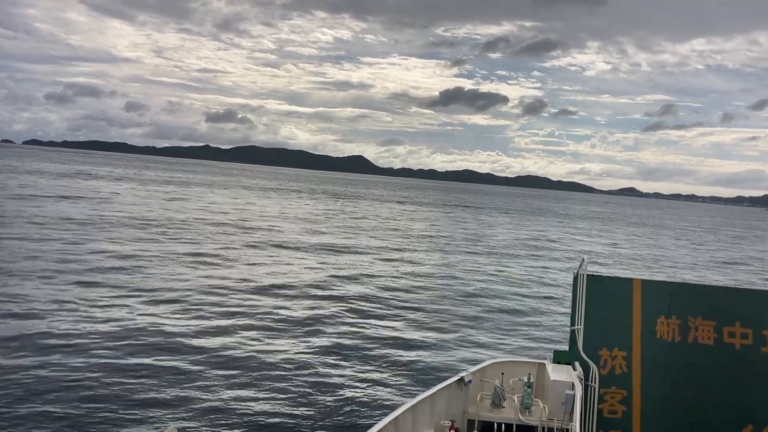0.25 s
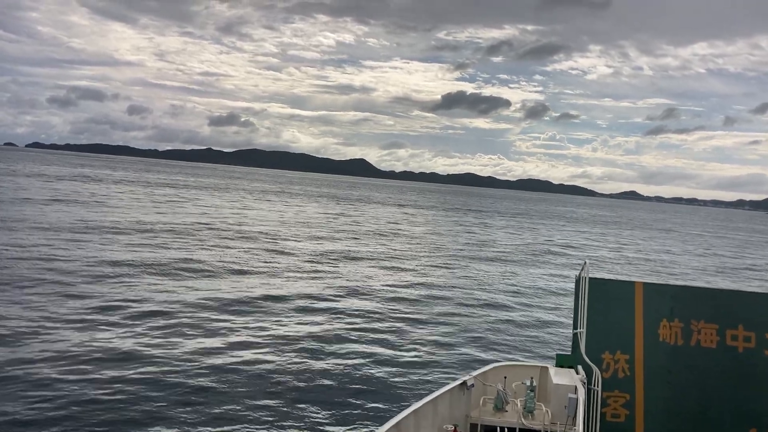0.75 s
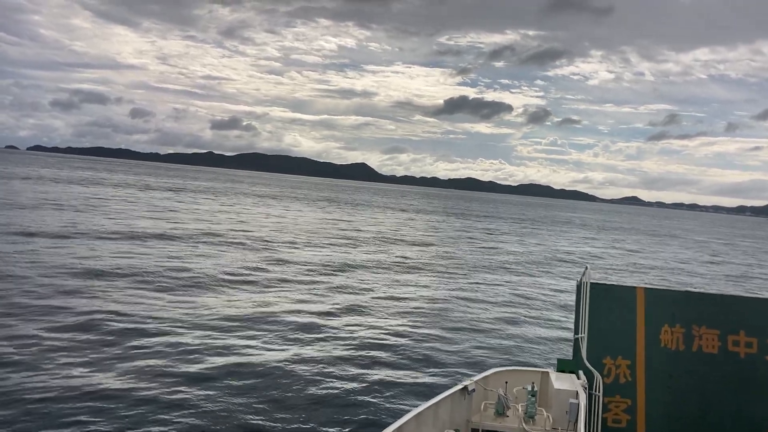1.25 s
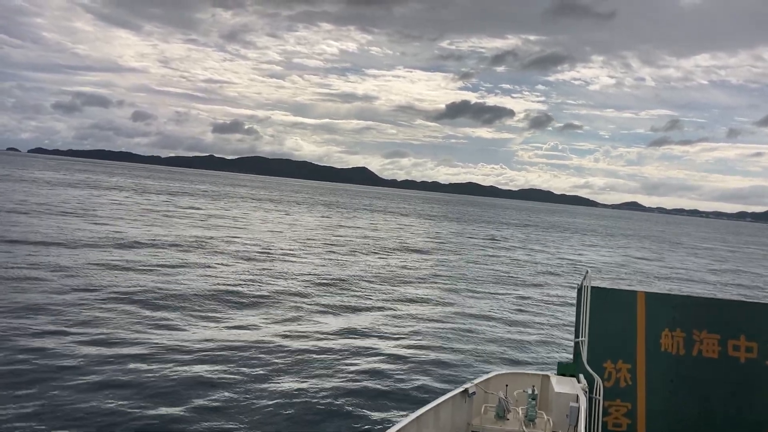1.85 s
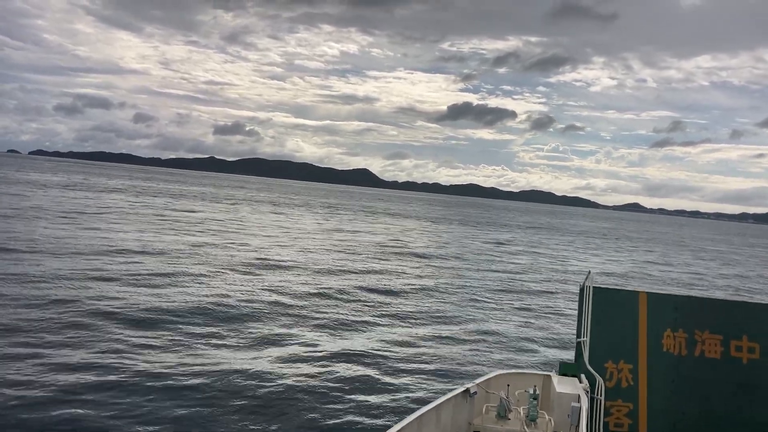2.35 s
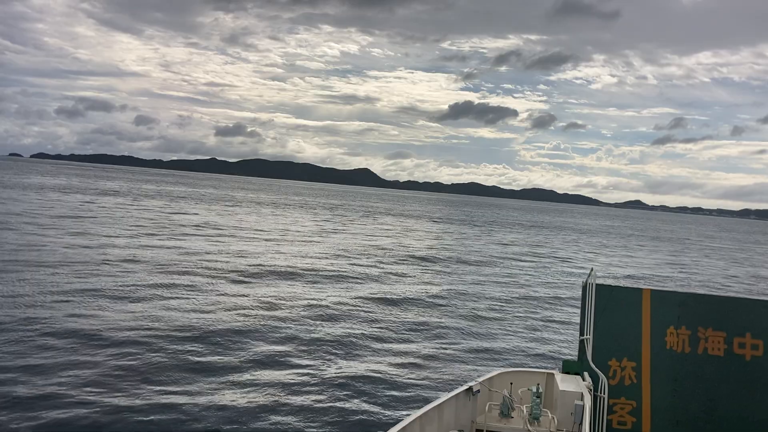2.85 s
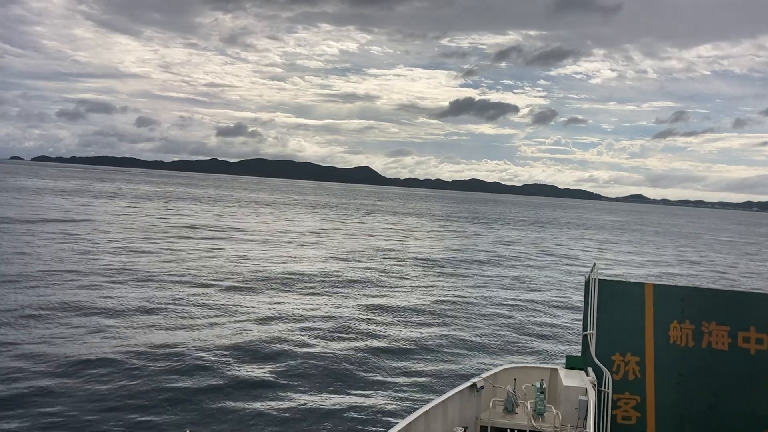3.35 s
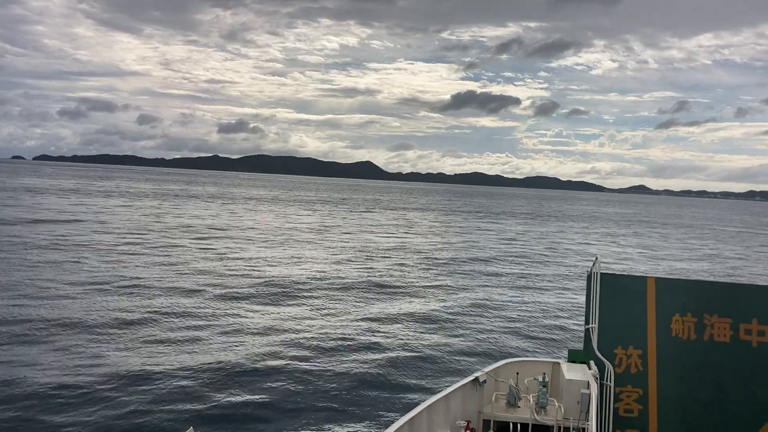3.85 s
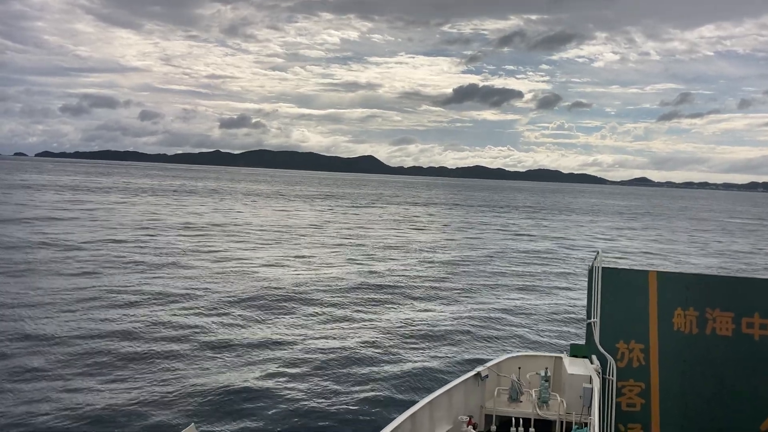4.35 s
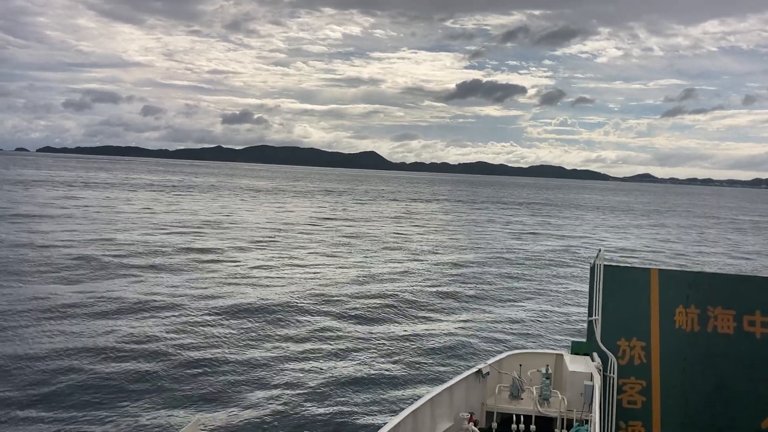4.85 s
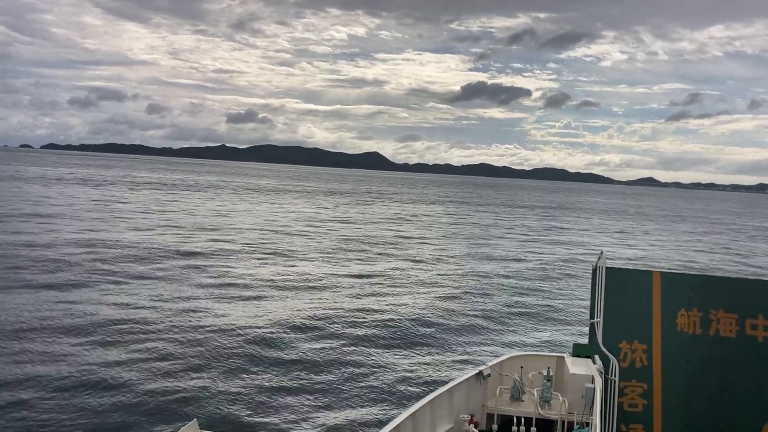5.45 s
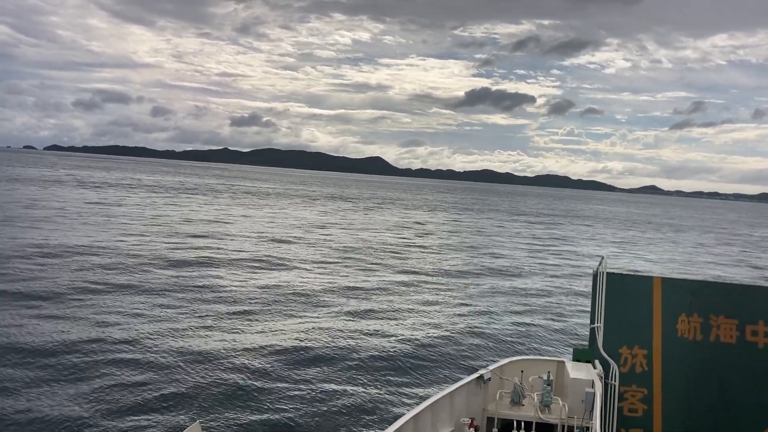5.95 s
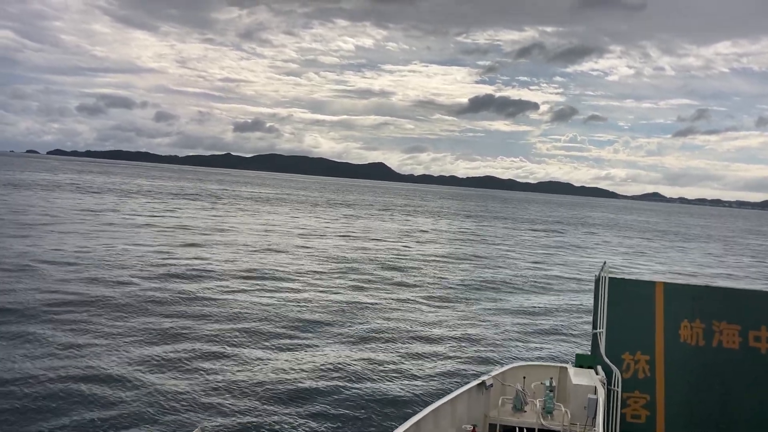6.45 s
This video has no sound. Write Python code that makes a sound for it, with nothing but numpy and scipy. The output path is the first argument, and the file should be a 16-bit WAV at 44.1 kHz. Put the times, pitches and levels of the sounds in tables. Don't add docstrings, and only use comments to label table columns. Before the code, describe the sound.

On the open upper deck of a ferry under way, a slow, heavy diesel drones without change, its deep hum strongest near fifty hertz. Smaller machines hum beside it and water rumbles against the steel hull. Soft wash slides along the side. A spray hiss fades at the very start, returns as a gentle swell around two seconds, then stays faint. Handheld phone, stereo, dull and bass-heavy.

```python
import sys
import numpy as np
from scipy import signal
from scipy.fft import rfft, irfft
from scipy.io import wavfile
from scipy.ndimage import uniform_filter1d

SR = 44100
rng = np.random.default_rng(int(sys.argv[2]) if len(sys.argv) > 2 else 0)


def wrap_up_sound(samples):
    columns = np.atleast_2d(samples).T
    tamed = np.clip(columns, -1, 1)
    steps = np.round(tamed * 32767).astype(np.int16)
    wavfile.write(sys.argv[1], SR, steps)


def rack_gain(trim_db):
    fader = np.asarray(trim_db, float)
    return 10 ** (fader / 20)


N = 295470
T = np.arange(N) / SR
F = np.fft.rfftfreq(N, 1 / SR) + 1e-3


def swing(rows, column):
    rows = np.array(rows)
    return np.interp(T, rows[:, 0], rows[:, column] - np.median(rows[:, column]))


def walk(rate_hz):
    hold = int(SR / rate_hz)
    steps = np.repeat(rng.standard_normal(N // hold + 1), hold)
    smooth = uniform_filter1d(uniform_filter1d(steps, hold), hold)
    return 1.3 * smooth[:N]


def density(table, hz):
    rows = np.array(table)
    return np.interp(np.log(hz), np.log(rows[:, 0]), rows[:, 1], left=-160, right=-160)


def noise(table, level_db, flicker_db, flicker_hz, grains=1.):
    white = rfft(rng.standard_normal((2, N)) * grains)
    coloured = white * rack_gain(density(table, F)) * np.sqrt(SR / 2)
    lowest = int(np.log2(table[0][0]))
    highest = int(np.log2(table[-1][0])) + 1
    out = 0
    for octave in range(lowest, highest + 1):
        band = np.cos(np.pi / 2 * np.clip(np.log2(F) - octave, -1, 1)) ** 2
        out = out + irfft(coloured * band, N) * rack_gain(flicker_db * walk(flicker_hz))
    return out * rack_gain(level_db)


# start_s, level_db
SPRAY_SWELLS = [(0.0, -52), (0.02, -56), (0.09, -60), (0.28, -66.5), (1.06, -67.5), (1.12, -68.5),
                (1.53, -68), (1.7, -64), (1.73, -61.5), (1.96, -56.5), (2.18, -54.5), (2.46, -60.5),
                (2.97, -61.5), (3.0, -65.5), (3.69, -67.5), (3.75, -65), (3.77, -61.5), (3.9, -67),
                (4.14, -71), (4.22, -66), (4.81, -68.5), (5.39, -67.5), (5.73, -67), (5.9, -65.5),
                (5.93, -69), (6.47, -65.5), (6.53, -64.5), (6.68, -63), (6.7, -60)]
# pitch_hz, level_db (per Hz)
SPRAY_COLOUR = [(1000, -108), (3000, -101), (6000, -101), (9000, -101), (12000, -102), (14500, -106),
                (16000, -108)]


def spray():
    hold = 40
    sizes = np.repeat(rng.exponential(size=N // hold + 1), hold)[:N]
    drops = rack_gain(1.5 * uniform_filter1d(sizes, size=20))
    drops = drops / np.sqrt(np.mean(drops ** 2))
    return noise(SPRAY_COLOUR, 1.05 * swing(SPRAY_SWELLS, 1), flicker_db=.5, flicker_hz=12., grains=drops)


# start_s, rumble_level_db, wash_level_db
SEA_SWELLS = [(0.0, -26, -42), (0.02, -23, -48), (0.09, -18, -50), (0.15, -25, -51.5), (0.32, -20.5, -54.5),
              (0.39, -28, -55), (0.5, -21.5, -56), (0.76, -22.5, -54), (0.82, -23.5, -56),
              (0.93, -21, -53.5), (1.36, -19, -53), (1.42, -23.5, -53), (1.55, -22.5, -56),
              (1.6, -18.5, -52), (1.73, -22.5, -53.5), (1.83, -19, -53), (1.96, -24, -50.5),
              (2.03, -17.5, -50), (2.16, -21.5, -47.5), (2.5, -19.5, -52), (2.56, -23.5, -51),
              (2.82, -18, -51.5), (2.99, -21, -53), (3.06, -26, -55), (3.25, -22.5, -54), (3.6, -23, -57),
              (3.71, -24.5, -55), (3.81, -20.5, -53), (4.03, -25.5, -56), (5.2, -22.5, -55),
              (5.26, -26, -53), (5.41, -22, -51.5), (6.01, -23.5, -55), (6.21, -20, -56), (6.36, -25, -55),
              (6.68, -21.5, -52), (6.7, -21, -47)]
# pitch_hz, level_db (per Hz)
WASH_COLOUR = [(700, -89), (1300, -80), (1850, -77.5), (2300, -83.5), (3200, -89.5), (5000, -95.5),
               (7000, -106), (10000, -118)]


def bow_wash():
    return noise(WASH_COLOUR, .6 * swing(SEA_SWELLS, 2), flicker_db=.8, flicker_hz=5.)


# pitch_hz, level_db (per Hz)
RUMBLE_COLOUR = [(15, -69), (32, -60), (50, -43.5), (90, -44.5), (140, -48), (240, -51.5), (300, -56.5),
                 (480, -62.5), (780, -65), (1000, -72), (1300, -83.5), (2000, -100)]


def hull_rumble():
    return noise(RUMBLE_COLOUR, .3 * swing(SEA_SWELLS, 1), flicker_db=.8, flicker_hz=3.)


# pitch_hz, level_db, wander_hz
MACHINE_TONES = [(60.15, -27, .02), (70.0, -34, .02), (457.6, -50, .5), (781, -53, 2.5), (932, -55.5, .8),
                 (950, -55, .8), (2371, -74, .3), (2401, -67, .3), (3301, -80, .4)]


def machinery():
    out = 0
    for pitch_hz, level_db, wander_hz in MACHINE_TONES:
        level = np.sqrt(2) * rack_gain(level_db + 1.5 * walk(1.5))
        phase = 2 * np.pi * np.cumsum(pitch_hz + wander_hz * walk(3)) / SR
        out = out + level * np.sin(phase + rng.uniform(0, 2 * np.pi))
    return out


# multiple (of the engine cycle), level_db
ENGINE_TONES = [(6, -35), (9, -36), (12, -16.5), (14, -38.5), (16, -37.5), (17, -31.5), (18, -25),
                (20, -40.5), (21, -40.1), (24, -36.3), (25, -43), (26, -39), (27, -35), (28, -31),
                (29, -35.0), (31, -30.5), (32, -40.5), (33, -40), (36, -38), (39, -40.5), (41, -40),
                (45, -44.5), (48, -47), (51, -44), (53, -42.9), (54, -42.5), (56, -47.2), (57, -43.8),
                (58, -43.0), (60, -48.5)]


def engine():
    cycle_hz = 4.487
    wander = .0006
    clatter_db, scatter_db = 1.5, 4.5
    angle = 2 * np.pi * np.cumsum(cycle_hz * (1 + wander * walk(.7))) / SR
    high = np.arange(61, 130)
    high_db = density(RUMBLE_COLOUR, high * cycle_hz) + clatter_db
    high_db = high_db + scatter_db * rng.standard_normal(len(high))
    wheel = np.linspace(0, 2 * np.pi, 8193)
    shape = 0
    for multiple, level_db in list(ENGINE_TONES) + list(zip(high, high_db)):
        shape = shape + rack_gain(level_db) * np.sin(multiple * wheel + rng.uniform(0, 2 * np.pi))
    return np.sqrt(2) * np.interp(angle % (2 * np.pi), wheel, shape) * rack_gain(.3 * walk(2.5))


# pitch_hz, likeness (0-1), left_lag_half_turns, left_minus_right_db
PORT_DIFFERENCES = [(40, .99, 0, -3.5), (130, .97, 0, -2.1), (400, .93, 0.11, -0.5), (900, .7, .5, -.2),
                    (1500, .35, 1, 0.8), (3000, .2, 1.78, 0.5), (5500, .4, 3.5, 0), (7000, .9, 3.5, 0),
                    (9100, .85, 5, -0.5), (11350, .85, 5.5, 0), (13600, .8, 6.5, -0.5),
                    (15800, .8, 8.05, 0.5)]


def two_ports(tones, water):
    shared, other = rfft(water)
    tones = rfft(tones)
    hz, *columns = np.transpose(PORT_DIFFERENCES)
    like, half_turns, pan_db = (np.interp(F, hz, column) for column in columns)
    like = np.clip(like, 0, 1)
    left = tones + like * shared + np.sqrt(1 - like ** 2) * other
    left = left * np.exp(-1j * np.pi * half_turns)
    right = tones + shared
    return irfft(np.array([left * rack_gain(pan_db / 2), right * rack_gain(-pan_db / 2)]), N)


def scene():
    water = spray() + bow_wash() + hull_rumble()
    tones = machinery() + engine()
    return two_ports(tones, water)


def roll_off(x):
    return signal.sosfilt(signal.butter(12, 17090, fs=SR, output="sos"), x)


def record(dry):
    top_hz = 15750
    steep_cut = signal.ellip(8, .2, 70, top_hz, fs=SR, output="sos")
    mix = signal.sosfilt(steep_cut, dry)
    return roll_off(mix)


dry = scene()
out = record(dry)
wrap_up_sound(out)
```